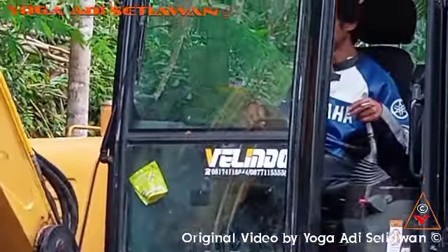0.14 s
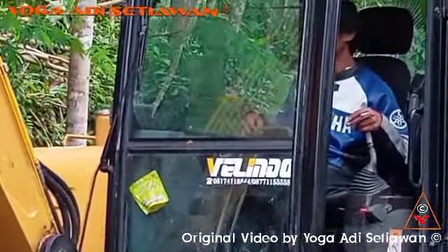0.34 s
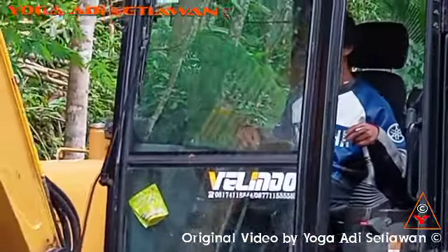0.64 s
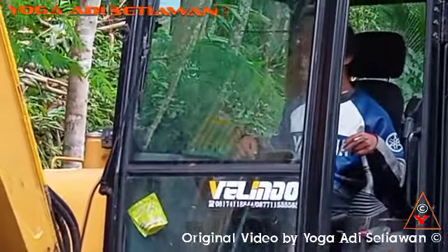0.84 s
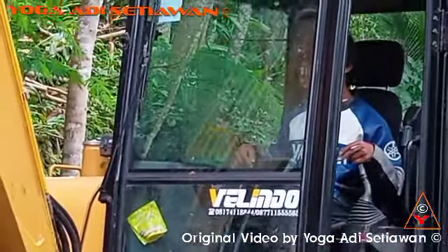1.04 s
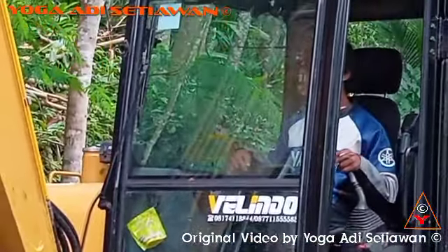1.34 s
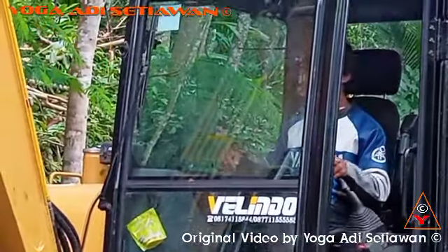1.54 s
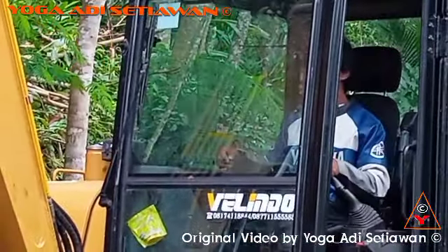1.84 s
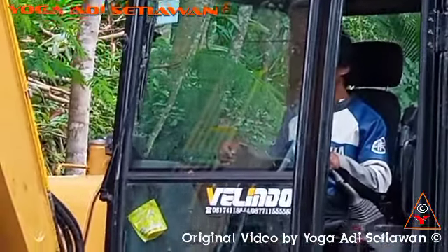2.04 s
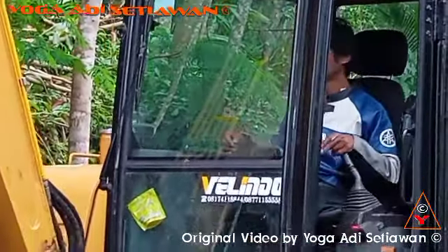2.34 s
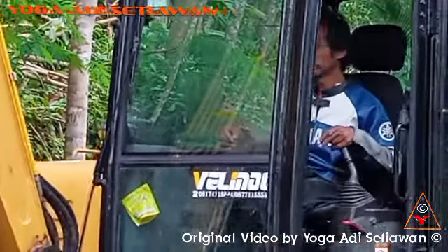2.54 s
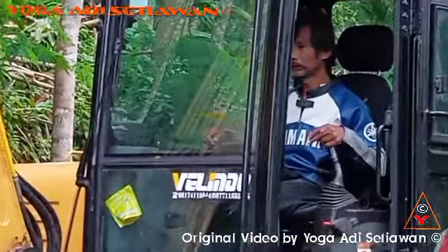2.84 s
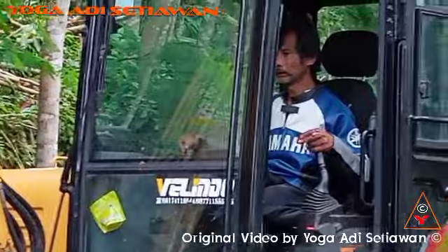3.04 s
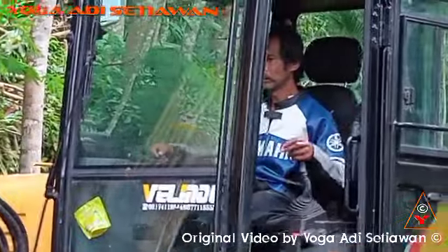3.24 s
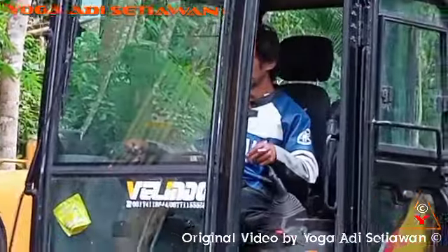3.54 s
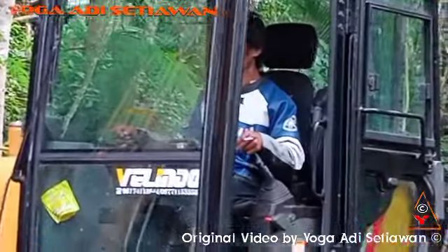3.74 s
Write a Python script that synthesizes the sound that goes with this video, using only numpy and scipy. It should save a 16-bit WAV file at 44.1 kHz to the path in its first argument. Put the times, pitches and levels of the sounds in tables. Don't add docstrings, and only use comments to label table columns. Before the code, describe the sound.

Excavator engine hums low and steady, with sharp metallic bucket clanks and gritty scrapes amid shrill cicadas.

```python
import sys
import numpy as np
from scipy import signal
from scipy.fft import rfft, irfft, next_fast_len
from scipy.io import wavfile
from scipy.ndimage import uniform_filter1d, map_coordinates

SR = 44100
rng = np.random.default_rng(int(sys.argv[2]) if len(sys.argv) > 2 else 0)


def output_pcm(signal):
    pcm = np.clip(np.atleast_2d(signal).T, -1, 1) * 32767
    wavfile.write(sys.argv[1], SR, np.round(pcm).astype(np.int16))


def voltage_ratio(decibels):
    exponent = np.asarray(decibels, float) / 20
    return 10 ** exponent


N = 171990


def unit(x):
    return x / np.sqrt(np.mean(x ** 2) + 1e-20)


def along(points, hz):
    point_hz, value = np.transpose(points)
    return np.interp(np.log(hz + 1), np.log(point_hz + 1), value)


def curves(rows):
    s, *columns = np.transpose(rows)
    return [np.interp(np.arange(N) / SR, s, column) for column in columns]


def wobble(rate):
    knots = rng.standard_normal(int(N / SR * 200) + 4)
    return map_coordinates(knots, [np.arange(N) * rate / SR])


def filtered(x, response):
    size = next_fast_len(len(x) + 8192)
    return irfft(rfft(x, size) * response(np.fft.rfftfreq(size, 1 / SR)), size)[:len(x)]


def ringing(modes):
    def response(f):
        total = 0
        for k, (hz, width, db) in enumerate(modes):
            damping = 1j * f * width
            total = total + (-1) ** k * voltage_ratio(db) * damping / (hz * hz - f * f + damping)
        return total
    return response


def narrow(hz, width_hz, steep=2):
    return unit(filtered(rng.standard_normal(N), lambda f: np.exp(-np.abs((f - hz) / width_hz) ** steep)))


def rush(spectrum, patchy_db):
    z = signal.stft(rng.standard_normal(N + 512), nperseg=512)[2]
    patches = uniform_filter1d(rng.standard_normal(z.shape), size=5, axis=0)
    patches = uniform_filter1d(patches, size=10, axis=1)
    noise = signal.istft(z * voltage_ratio(patchy_db * unit(patches)), nperseg=512)[1][:N]
    return unit(filtered(noise, lambda hz: voltage_ratio(along(spectrum, hz))))


def glide(rows, waver_db, rate):
    before = (rows[0][0] - .02, rows[0][1], -130)
    after = (rows[-1][0] + .02, rows[-1][1], -130)
    hz, db = curves([before, *rows, after])
    return np.sqrt(2) * voltage_ratio(db + waver_db * wobble(rate)) * np.sin(2 * np.pi * np.cumsum(hz) / SR)


def engine():
    # start_s, pitch_hz
    engine_speed = [
        (0, 108.3),
        (1.5, 108.8),
        (2.3, 109.1),
        (3.9, 109.4),
    ]
    # multiple of the turning speed, level_db (rms)
    piston_tones = [(2, -66.5), (4, -58.5), (9, -60.5), (18, -81.5)]
    # pitch_hz, width_hz, level_db (rms)
    cab_hum = [(145.2, 34, -58), (208.2, 14.6, -60), (179.5, 102, -59.5), (121, 17, -65.5)]
    # pitch_hz, width_hz, level_db (rms)
    shroud_tones = [(733, 293, -60.5), (2190, 260, -69), (5576, 230, -75), (1254, 46, -75.5),
                    (2705, 430, -69)]
    # pitch_hz, level_db (per Hz)
    body_spectrum = [(25, -12), (45, -31), (85, -11), (110, -10), (255, -9), (300, -16), (520, -21.5),
                     (1100, -26)]
    # pitch_hz, level_db (per Hz)
    fan_spectrum = [(900, -44), (1200, 6.5), (2300, -0.5), (3500, -1.5), (5600, -8), (7500, -14.5),
                    (12500, -30), (15300, -24.5)]
    # start_s, pitch_hz, level_db (rms)
    valve_moan = [
        (.1, 335, -75),
        (.25, 326.7, -59.5),
        (.45, 295, -65),
        (.65, 283, -95),
    ]
    unsteady = 0.003
    lope_db = 1
    body_db, fan_db = -56.5, -63

    turn = np.pi / 2 * np.cumsum(curves(engine_speed)[0] * (1 + unsteady * wobble(8))) / SR
    out = glide(valve_moan, waver_db=-0.5, rate=10)
    for multiple, db in piston_tones:
        strength = np.sqrt(2) * voltage_ratio(db + lope_db * wobble(5.78))
        out += strength * np.sin(multiple * turn + rng.uniform(0, 8.4))
    for hz, width, db in cab_hum:
        out += voltage_ratio(db + 2.6 * wobble(7.7)) * narrow(hz, width / 2)
    for hz, width, db in shroud_tones:
        out += voltage_ratio(db + 0.78 * wobble(5.36)) * narrow(hz, width * 0.53, steep=4.5)
    out += voltage_ratio(body_db) * rush([(10, -120), *body_spectrum, (3000, -120)], patchy_db=1.5)
    out += voltage_ratio(fan_db) * rush([(500, -120), *fan_spectrum], patchy_db=.8)
    return out


def insects():
    # start_s, level_db
    cicada_swell = [
        (0.0, -51.5),
        (0.39, -50.5),
        (2.03, -50),
        (2.41, -48),
        (2.81, -52.5),
        (3.9, -51),
    ]
    # start_s, pitch_hz, level_db (rms)
    cricket_song = [
        (.07, 13500, -105),
        (.12, 14000, -85),
        (.25, 14100, -82),
        (.46, 14100, -83),
        (.5, 13800, -93),
        (.58, 13850, -99),
    ]
    # start_s, level_db (peak)
    twig_ticks = [
        (0.159, -64),
        (0.4544, -72),
        (0.6624, -71),
    ]
    cicada_db, overtone_db = -52.5, -35

    swell_db, = curves(cicada_swell)
    chorus = narrow(4679, 186, steep=4.8) * voltage_ratio(0.51 * wobble(8.56))
    chorus += voltage_ratio(overtone_db) * narrow(9520, 330)
    chorus *= voltage_ratio(cicada_db + swell_db - swell_db.mean())
    flutter = 1 + .35 * np.sin(2 * np.pi * 320 * np.arange(N) / SR)
    cricket = glide(cricket_song, waver_db=1.0, rate=29) * flutter
    ticks = np.zeros(N)
    for s, db in twig_ticks:
        ticks[round(s * SR)] = voltage_ratio(db + 18)
    return chorus + cricket + filtered(ticks, ringing([(15000, 2500, 0)]))


def surges():
    # start_s (middle of the lump), level_db (peak)
    pump_pulls = [(0.146, -44.5), (0.301, -52), (0.604, -46.5), (0.758, -43), (0.957, -44.5),
                  (1.258, -43.5), (1.545, -49), (1.835, -43), (2.119, -46.0), (2.544, -44.5), (2.644, -46),
                  (2.839, -44.0), (3.01, -46.5), (3.108, -44.0), (3.229, -46.5), (3.446, -42.0),
                  (3.574, -41), (3.703, -46.0)]
    boom_hz, lump_s = 144.1, 0.03
    t = np.arange(N) / SR
    lumps = sum(voltage_ratio(db) * np.exp(-((t - s) / lump_s) ** 2) for s, db in pump_pulls)
    hz = boom_hz * (1 + 0.02993 * wobble(9))
    return lumps * np.sin(2 * np.pi * np.cumsum(hz) / SR)


def contact(shape, modes, top_hz, favoured=()):
    grain, grit_db = 40, 2
    widen, detune, recolour_db = 2.6, .04, 2
    favour_db, favour_q, away_db_per_octave = 4.5, 7.64, 2.5

    lumps = np.repeat(rng.standard_normal(len(shape) // grain + 1), grain)[:len(shape)]
    grit = rng.standard_normal(len(shape)) * voltage_ratio(grit_db * lumps)
    luck = rng.standard_normal((len(modes), 2))
    picked = [(hz, hz / favour_q, favour_db) for hz in favoured]
    for (hz, width, db), (pitch_luck, level_luck) in zip(modes, luck):
        away_db = away_db_per_octave * sum(abs(np.log2(hz / best)) for best in favoured)
        picked.append((hz * (1 + detune * pitch_luck), widen * width, db + recolour_db * level_luck - away_db))
    answer = ringing(sorted(picked))
    rung = filtered(unit(grit) * shape, lambda f: answer(f) / (1 + 1j * f / top_hz) ** 3)
    return rung / np.sqrt(np.sum(rung ** 2) / np.sum(shape ** 2))


def bucket():
    # start_s, level_db (peak), treble_db (over the peak), fade_s (by 60 dB), pitch_hz (loudest)
    stone_knocks = [(1.2462, -39, -28, 0.16, 995), (1.433, -24, -21, 0.084, 2960),
                    (1.4861, -19.5, -14, 0.068, 2010), (2.0529, -34.5, -26.5, 0.053, 2160),
                    (2.1633, -34, -17.5, 0.11, 2918), (2.377, -44.5, -29, 0.28, 1590),
                    (2.4301, -38, -24, 0.077, 790), (2.5575, -38.5, -41, 0.086, 930),
                    (2.595, -43.5, -35, 0.052, 3150), (2.7123, -39, -37, 0.05, 3050),
                    (2.7877, -30, -18, 0.21, 1800), (2.809, -31, -12.5, 0.068, 1076),
                    (3.05, -51.5, -21, 0.27, 2250), (3.272, -31.5, -21, 0.07, 950),
                    (3.3353, -35, -22, 0.11, 2870), (3.503, -20, -13, 0.043, 980)]
    # start_s (at the peak), level_db, treble_db (over it), half_length_s, pitch_hz (loudest)
    soil_rubs = [(1.238, -53, -42, 0.0064, 710), (1.299, -47.5, -25, 0.0054, 3300),
                 (1.342, -52, -27, 0.011, 1420), (1.39, -45.5, -27, 0.014, 1600),
                 (1.428, -30.5, -19, 0.0044, 3140), (1.441, -35, -13, 0.013, 900),
                 (1.513, -26, -23, 0.0056, 900), (1.552, -49, -36, 0.011, 2750),
                 (2.118, -42, -24, 0.0089, 1760), (2.452, -44, -23, 0.013, 900),
                 (2.573, -38.5, -24, .01, 2120), (2.67, -40, -26, 0.017, 1470),
                 (2.735, -41, -26, 0.013, 815), (2.827, -32, -34, 0.0057, 670),
                 (3.301, -36.5, -24, 0.029, 1660), (3.395, -46, -38, .03, 1600),
                 (3.438, -38, -21, 0.025, 1580), (3.485, -32.5, -25, 0.019, 2430),
                 (3.517, -23.5, -17.5, 0.015, 1670), (3.538, -34, -21, 0.024, 900)]
    # start_s, level_db (peak), fade_s (by 60 dB), pitch_hz (loudest)
    arm_thuds = [(1.246, -31.5, 0.063, 386.4), (1.262, -41, 0.11, 291), (1.49, -32, 0.15, 334),
                 (1.509, -31.5, 0.14, 423), (2.054, -42.5, 0.11, 420), (2.162, -40, 0.14, 410),
                 (2.389, -49.5, 0.24, 461), (2.559, -31, 0.11, 385), (2.66, -38.5, 0.064, 320),
                 (2.79, -29, 0.042, 320), (2.81, -35, 0.08, 630), (3.272, -41.5, 0.51, 593),
                 (3.426, -28, 0.15, 269), (3.503, -30.5, 0.23, 351), (3.573, -43.5, 0.36, 237)]
    # pitch_hz, width_hz, level_db
    steel_modes = [(640, 130, -3.5), (852, 100, 1), (1426, 47, 2), (1665, 178, -1.5), (2020, 122, -1.5),
                   (2297, 102, 2), (2622, 74, 2.5), (2960, 81, 3), (3600, 83, 1), (4120, 400, -10)]
    # pitch_hz, width_hz, level_db
    teeth_modes = [(4312, 96, -13), (4563, 324, 20), (5720, 98, 20), (6050, 100, 9.5), (6650, 350, 20),
                   (11800, 8200, 4)]
    # pitch_hz, width_hz, level_db
    arm_modes = [(153, 24.6, -2.5), (236, 44, -6), (320, 18.6, -3), (385, 15, 1), (443, 16.6, -1.5),
                 (470, 27, -10.5)]
    # pitch_hz, level_db
    teeth_reach = [(7300, 0.5), (8200, -6.5), (12900, -9), (14200, -19), (15000, 0)]
    knock_rise_s, thud_rise_s = 0.0046, 0.0035
    steel_db, teeth_db, arm_db = -5, 5, -3.5
    steel_top_hz, teeth_top_hz, arm_top_hz = 4850, 19400, 900

    out, bright = np.zeros(N + SR), np.zeros(N + SR)
    lead = SR // 20
    t = np.arange(-lead, SR // 5) / SR

    def blow(rise_s, fade_s):
        return np.clip(t / rise_s + 1, 0, 1) ** 2 * voltage_ratio(-60 * np.maximum(t, 0) / fade_s)

    touches = [(s, db, treble_db, blow(knock_rise_s, fade_s), hz)
               for s, db, treble_db, fade_s, hz in stone_knocks]
    touches += [(s, db, treble_db, np.exp(-(t / half_s) ** 2), hz)
                for s, db, treble_db, half_s, hz in soil_rubs]
    for s, db, treble_db, shape, hz in touches:
        place = slice(round(s * SR) - lead, round(s * SR) - lead + len(t))
        out[place] += voltage_ratio(db + steel_db) * contact(shape, steel_modes, steel_top_hz, [hz])
        teeth = contact(shape ** 1.25, teeth_modes, teeth_top_hz)
        bright[place] += voltage_ratio(db + teeth_db + treble_db) * teeth
    for s, db, fade_s, hz in arm_thuds:
        thud = contact(blow(thud_rise_s, fade_s), arm_modes, arm_top_hz, [hz])
        out[round(s * SR) - lead:][:len(t)] += voltage_ratio(db + arm_db) * thud
    return out[:N] + filtered(bright[:N], lambda f: voltage_ratio(along(teeth_reach, f)))


def pings():
    # start_s (at the peak), level_db (peak), pitch_hz
    single_rings = [(1.393, -52, 2710), (1.434, -29.5, 3020), (1.442, -35, 907), (1.443, -34.5, 4995),
                    (1.487, -42, 5813), (1.487, -35, 6560), (1.489, -27.5, 3229), (1.49, -32, 2500),
                    (1.557, -65, 6450), (1.557, -46, 2650), (1.566, -44, 2820), (2.054, -42, 935),
                    (2.056, -41.5, 2440), (2.109, -46, 2690), (2.111, -47, 2030), (2.164, -42, 1410),
                    (2.165, -51, 6000), (2.166, -46, 6760), (2.429, -55, 6500), (2.432, -47, 3273),
                    (2.434, -45, 2570), (2.451, -54, 6600), (2.453, -58, 6000), (2.564, -46, 2040),
                    (2.673, -44, 2780), (2.674, -46.5, 5469), (2.714, -53, 2540), (2.732, -55, 6500),
                    (2.734, -45.5, 896), (2.79, -40, 6632), (2.813, -33.5, 5580), (2.867, -45, 2600),
                    (2.887, -47, 2250), (2.905, -50, 2850), (3.275, -37, 908), (3.281, -47, 2510),
                    (3.294, -43, 1630), (3.295, -43, 2400), (3.3, -44, 840), (3.304, -42, 1700),
                    (3.304, -38, 2500), (3.305, -46, 5270), (3.315, -39, 1755), (3.317, -46.5, 514),
                    (3.337, -56, 6370), (3.34, -44, 1490), (3.343, -44, 3130), (3.424, -46, 2454),
                    (3.432, -39, 890), (3.433, -56, 6330), (3.435, -49, 5770), (3.503, -43, 6500),
                    (3.505, -28, 5570), (3.514, -36.5, 7060), (3.518, -24.5, 1703), (3.541, -32.5, 888),
                    (1.25, -37.5, 395), (1.275, -42, 319), (1.507, -35.5, 900), (2.599, -49, 3229),
                     (2.793, -36, 2900), (2.81, -40, 1470), (2.816, -33, 2386), (2.828, -38, 645),
                     (3.06, -49.5, 2360), (3.477, -41, 2239), (3.506, -33, 757), (3.507, -35, 2325),
                     (3.518, -30.5, 3540)]
    rise_s, fade_s, usual_hz = 0.0034, 0.024, 2500
    pings_db = 2
    out, lead = np.zeros(N), SR // 50
    t = np.arange(-lead, SR // 10) / SR
    for s, db, hz in single_rings:
        slow = np.sqrt(usual_hz / hz)
        rise = np.exp(-(np.minimum(t, 0) / (rise_s * slow)) ** 2)
        fade = voltage_ratio(-60 * np.maximum(t, 0) / (fade_s * slow))
        out[round(s * SR) - lead:][:len(t)] += voltage_ratio(db + pings_db) * rise * fade * np.sin(2 * np.pi * hz * t)
    return out


def trees(x):
    # pitch_hz, fade_s (by 60 dB)
    wood_fade = [(200, 0.54), (2000, 0.47), (6000, 0.36), (12000, 0.28)]
    out, step, delay = np.zeros(N + SR), 3072, 600
    hz, t, z = signal.stft(rng.standard_normal((N // step + 1, SR // 3)), SR, nperseg=256)
    fade = voltage_ratio(-60 * t / along(wood_fade, hz)[:, None])
    tails = signal.istft(z * fade, SR, nperseg=256)[1]
    for k, tail in enumerate(tails):
        echo = signal.fftconvolve(x[k * step:][:step], tail / np.linalg.norm(tail))
        out[k * step + delay:][:len(echo)] += echo
    return out[:N]


def scene():
    background = engine() + insects() + surges()
    steel, rings = bucket(), pings()
    answer = voltage_ratio(-10) * trees(steel + voltage_ratio(-4.5) * rings)
    return (background + steel + rings + answer)[None]


def low_pass(x):
    return signal.sosfilt(signal.butter(12, 16310, fs=SR, output="sos"), x)


def record(dry):
    low_hz, top_hz = 38.3, 15560

    def microphone(f):
        bass = 1j * f / low_hz
        return (f < top_hz) * (bass / (1 + bass)) ** 3

    heard = filtered(dry[0], microphone)
    return low_pass(heard[None])


dry = scene()
out = record(dry)
output_pcm(out)
```